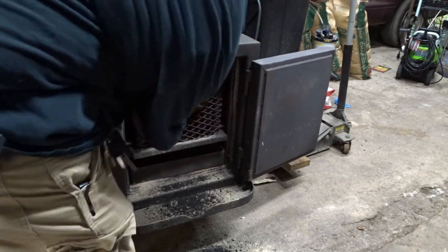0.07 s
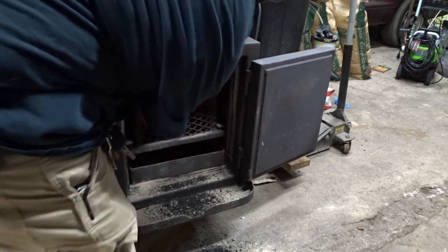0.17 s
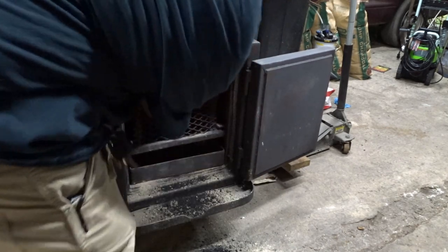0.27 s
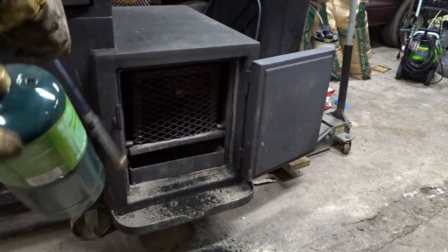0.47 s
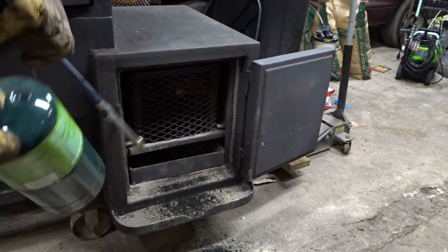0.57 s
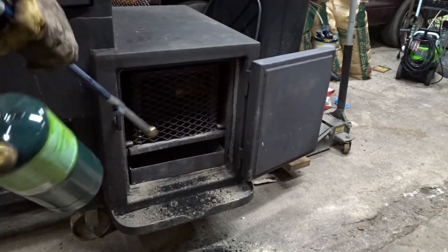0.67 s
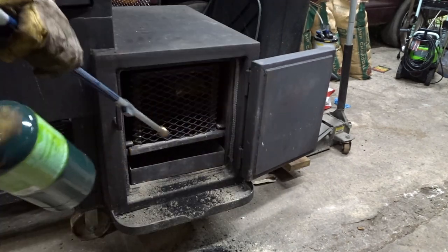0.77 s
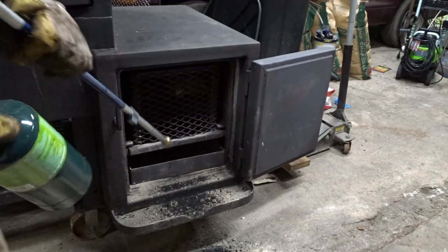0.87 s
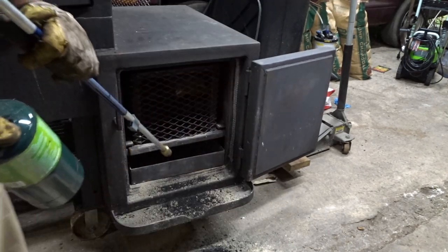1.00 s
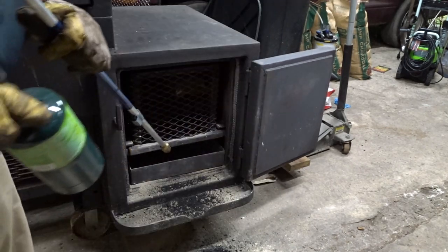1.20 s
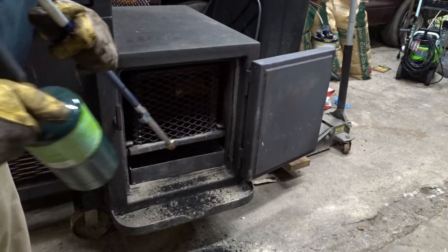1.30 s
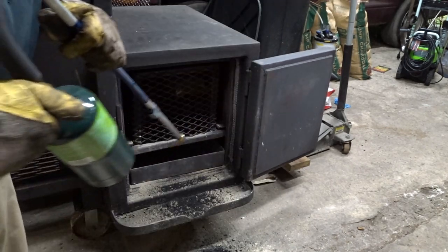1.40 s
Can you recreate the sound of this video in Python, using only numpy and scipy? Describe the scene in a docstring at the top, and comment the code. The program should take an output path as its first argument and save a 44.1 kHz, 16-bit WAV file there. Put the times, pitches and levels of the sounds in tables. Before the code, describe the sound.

Close by in a garage, something shoved over a steel grate hisses, then grinds as the firebox rings and rumbles. The brief scrape stops suddenly; soft cloth rustle and light ticks from a gas torch follow over low hum.

```python
"""A shove across a steel grate

A load is pushed over the grate of a smoker's firebox in a garage. It slides with a rising hiss, then
bites and scrapes, making the steel groan and ring and the box boom, until the sound cuts off abruptly.
Over the quiet room hum, clothes rustle and a hand-held gas torch ticks as it is handled."""
import sys
import numpy as np
from scipy import signal
from scipy.io import wavfile
from scipy.ndimage import uniform_filter1d

SR = 44100
rng = np.random.default_rng(int(sys.argv[2]) if len(sys.argv) > 2 else 0)


def wav_out(sig):
    """Save sig, one row per channel (or a flat mono array), as 16-bit PCM at SR to the path in sys.argv[1]."""
    wavfile.write(sys.argv[1], SR, np.round(np.clip(np.atleast_2d(sig).T, -1, 1) * 32767).astype(np.int16))


N = 63945
TIME = np.arange(N) / SR


def from_db(db):
    """Turn decibels into a number to multiply by."""
    return 10 ** (np.asarray(db) / 20)


def rms_one(x):
    """Scale a sound to an average strength (rms) of one."""
    return x / np.sqrt(np.mean(x ** 2) + 1e-20)


def in_time(rows):
    """Join a table's rows with straight lines: one curve for each column after the time."""
    times, *columns = np.transpose(rows)
    return [np.interp(TIME, times, column) for column in columns]


def at_hz(rows, hz):
    """Read a table at any frequency, with octaves evenly spaced."""
    freqs, values = np.transpose(rows)
    return np.interp(np.log(hz), np.log(freqs), values)


def ramp(start_s, length_s):
    """Rise from zero to one."""
    return np.clip((TIME - start_s) / length_s, 0, 1)


def pan(db):
    """Make the left side louder than the right by this many decibels."""
    return from_db(np.array([[db], [-db]]) / 2)


def drift(rate_hz):
    """A smooth random wander, about one in size."""
    r = np.exp(-2 * np.pi * rate_hz / SR)
    return rms_one(signal.lfilter([1], [1, -2 * r, r * r], rng.standard_normal(N + SR))[SR:])


def resonate(x, hz, width_hz):
    """Let a sound ring at one pitch; the smaller the width, the longer it rings."""
    r = np.exp(-np.pi * width_hz / SR)
    feedback = [1, -2 * r * np.cos(2 * np.pi * hz / SR), r * r]
    return signal.lfilter(np.array([1, 0, -1]) * (1 - r * r) / 2, feedback, x)


def friction(grainy, grains_per_s=2500, spread_db=4):
    """Two streams of tiny clicks in smooth noise; grainy is the clicks' share of the power."""
    sizes = from_db(spread_db * np.minimum(rng.exponential(1, (2, N)), 4))
    signs = rng.choice([-1, 1], (2, N))
    grains = rms_one(sizes * signs * (rng.random((2, N)) < grains_per_s / SR))
    return np.sqrt(grainy) * grains + np.sqrt(1 - grainy) * rng.standard_normal((2, N))


def coloured(colour, likeness, grainy):
    """Stereo friction noise with a given colour (its balance of low and high), built band by band."""
    edges = 18 * 2 ** (np.arange(31) / 3)
    out, streams = 0, [friction(grainy), friction(grainy)]
    for k, (low, high) in enumerate(zip(edges, edges[1:])):
        band = signal.butter(2, [low, high], "band", fs=SR, output="sos")
        mid, side = signal.sosfilt(band, streams[k % 2])
        hz = np.sqrt(low * high)
        alike = at_hz(likeness, hz)
        stereo = np.sqrt(1 + alike) * mid + np.sqrt(1 - alike) * side * [[1], [-1]]
        out += from_db(at_hz(colour, hz)) * stereo
    return rms_one(out)


def ringing(tones, side_db=-10):
    """Random pushes keep an object's natural tones ringing, each held near its own level."""
    out = 0
    for hz, width_hz, db in tones:
        ring = resonate(rng.standard_normal((2, N + SR)), hz, width_hz)
        strength = np.sqrt(uniform_filter1d(ring ** 2, size=4000) + 1e-20)
        mid, side = (ring / strength)[:, SR:]
        spread = from_db(side_db) * min(hz / 600, 2)  # higher tones sound wider
        out += from_db(db) * (mid + spread * side * [[1], [-1]])
    return rms_one(out)


def wavering(hz, db, wander, rough_db):
    """A tone made by rubbing, unsteady in pitch and loudness."""
    phase = 2 * np.pi * np.cumsum(hz * (1 + wander * drift(38.8))) / SR
    return np.sqrt(2) * from_db(db + rough_db * drift(49)) * np.sin(phase)


# colour of the room's noise: f/Hz, level/dB
ROOM_COLOUR = [(12, -37), (20, -7.5), (80, -4), (191, -3), (280, -9), (450, -15.5), (1540, -19.5),
               (4950, -35), (11100, -37), (15500, -54)]
# how alike left and right are in the room: f/Hz, likeness/0-1
ROOM_ALIKE = [(60, 1), (200, 1), (600, 0.83), (2000, 0.39), (5000, 0.03), (12000, 0.033)]
# tones of the hum: f/Hz, width/Hz, level/dB
HUM_TONES = [(55.4, 1.2, -13), (90.3, 0.52, -3), (166.4, 1.8, 3.5), (192.1, 3.7, 0)]
# how the hum wavers: t/s, low tones/dB, higher tones/dB
HUM_LEVELS = [(0, -54, -53.5), (.95, -50.5, -50.5), (1.01, -51.5, -59), (1.24, -52.5, -54.5),
              (1.45, -48.5, -59)]
# a faint hollow tone comes and goes: t/s, level/dB
HOLLOW_LEVELS = [(.68, -65.5), (.79, -50.5), (1.03, -60), (1.13, -55), (1.2, -62)]
def garage(split_hz=120):
    """The room: steady noise, a wavering hum and a faint hollow tone."""
    low_db, high_db = in_time(HUM_LEVELS)
    hollow_db, = in_time(HOLLOW_LEVELS)
    hum = from_db(low_db) * ringing([m for m in HUM_TONES if m[0] < split_hz])
    hum += from_db(high_db) * ringing([m for m in HUM_TONES if m[0] >= split_hz])
    hollow = from_db(hollow_db) * ringing([(526.5, 23, 0)])
    return from_db(-49.5) * coloured(ROOM_COLOUR, ROOM_ALIKE, grainy=0) + hum + hollow


# loudness of the rustle: t/s, level/dB
CLOTH_LEVELS = [(0, -53), (.1, -56.5), (.572, -48.5), (.6, -56), (.76, -53), (.88, -51.5), (.92, -58),
                (1.15, -60), (1.19, -48.5), (1.31, -50), (1.45, -64)]
# colour of the rustle: f/Hz, level/dB
CLOTH_COLOUR = [(200, 5.5), (600, -2.5), (1500, -6), (2600, -7.5), (3700, -4), (6000, -17), (10000, -21.5),
                (15500, -26)]
def clothes():
    """Cloth rubs softly nearby."""
    db, = in_time(CLOTH_LEVELS)
    return from_db(db) * coloured(CLOTH_COLOUR, ROOM_ALIKE, grainy=0.28)


# each tick: t/s, peak/dB, pitch of its ring/Hz, ring compared with the peak/dB
TORCH_TICKS = [(0.891, -40.5, 1630, -0.5), (0.956, -55, 5600, 7), (1.014, -41.5, 5570, -2),
               (1.1718, -35.5, 3930, -8), (1.2152, -34, 2060, -7), (1.2493, -40, 3070, -6),
               (1.269, -31.5, 980, -7), (1.283, -39, 2650, -6)]
# natural tones of the torch: f/Hz, width/Hz, level/dB
TORCH_TONES = [(1930, 82, 0), (2900, 230, 10.5), (3050, 130, 8), (3700, 260, 6), (4780, 360, -1),
               (5200, 300, -10)]
def torch_ticks(snap=10, bounce_s=0.0042, fade_s=0.018, echo_s=0.18, ring_cycles=30):
    """A snap and a bounce shake the torch; the touched part rings and the room echoes faintly."""
    dull = signal.butter(4, 6200, fs=SR, output="sos")
    out = 0
    for s, db, hz, ring_db in TORCH_TICKS:
        age = np.maximum(TIME - s, 0)
        noise = rng.standard_normal((3, N))
        burst = noise[0] * from_db(-60 * age / fade_s)
        echo = noise[1:] * from_db(-9 - 60 * age / echo_s)
        push = (age > 0) * (burst + echo)
        push[:, int(s * SR)] += snap
        push[:, int((s + bounce_s) * SR)] += snap * from_db(-6)
        tick = sum(from_db(level) * resonate(push, f, width) for f, width, level in TORCH_TONES)
        tick = signal.sosfilt(dull, tick)
        ring = from_db(ring_db - 60 * age * hz / ring_cycles) * np.sin(2 * np.pi * hz * age)
        out += from_db(db) * (tick / np.abs(tick).max() + ring)
    return out * pan(4)


# low natural tones of the box: f/Hz, width/Hz, level/dB
BOX_TONES = [(86, 6, -9), (104, 2, 0), (160, 2, -2), (219.5, 3, -5)]
# loudness of the boom: t/s, deep tones/dB, higher tones/dB
BOOM_LEVELS = [(.292, -38.5, -49), (.312, -28, -38), (.35, -35.5, -37), (.395, -32, -26.5),
               (.475, -29.5, -31.5), (.525, -24, -35), (.546, -27.5, -33)]
def box_boom(split_hz=130):
    """The whole box rumbles, deeper as the load slows."""
    deep_db, higher_db = in_time(BOOM_LEVELS)
    deep = from_db(deep_db) * ringing([m for m in BOX_TONES if m[0] < split_hz])
    higher = from_db(higher_db) * ringing([m for m in BOX_TONES if m[0] >= split_hz])
    return deep + higher


# loudness of the singing inside the firebox: t/s, first tone/dB, second tone/dB
SINGING_LEVELS = [(.11, -80, -70), (.17, -45.5, -54), (.23, -38, -43), (.262, -33.5, -28.5),
                  (.283, -39, -42), (.288, -9, -31.5), (.32, -17, -47), (.344, -25, -45), (.362, -13, -34),
                  (.395, -34.5, -38), (.44, -26, -34.5), (.546, -32, -43)]
def box_singing(pitches_hz=(685.4, 891)):
    """Rubbing makes the hollow of the firebox sing two tones, like a pipe."""
    tones = zip(pitches_hz, in_time(SINGING_LEVELS))
    return sum(wavering(hz, db, wander=0.01535, rough_db=2.5) for hz, db in tones)


# each knock: t/s, thud/dB, pitch of the thud/Hz, crack/dB
LOAD_KNOCKS = [(.2205, -12, 677, -39.5), (.2875, -30, 970, -20.5), (.531, -22.5, 322, -44)]
def knocks(thud_s=0.052, crack_s=0.063, crack_hz=1820, width_hz=840):
    """The load catches, bites and lands, each time with a dull thud and a short crack."""
    out = 0
    for s, thud_db, hz, crack_db in LOAD_KNOCKS:
        age = np.maximum(TIME - s, 0)
        thud = from_db(thud_db - 60 * age / thud_s) * np.sin(2 * np.pi * hz * age)
        noise = resonate(rng.standard_normal(N), crack_hz, width_hz)
        crack = rms_one(resonate(noise, crack_hz, width_hz))
        out += thud + (age > 0) * from_db(crack_db - 60 * age / crack_s) * crack
    return out


# the groan rises as it takes hold and sags as the push eases: t/s, f/Hz
GROAN_HZ = [(.34, 326.3), (.38, 342.7), (.45, 344), (.52, 323)]
# loudness of the groan: t/s, level/dB
GROAN_LEVELS = [(.283, -42), (.297, -19), (.333, -27.5), (.35, -16), (.37, -32), (.387, -18), (.44, -16),
                (.478, -19), (.492, -28), (.503, -39), (.523, -35.5), (.546, -24.5)]
def groan():
    """The load sticks and slips so fast that the steel groans, first in fits, then firmly."""
    hz, = in_time(GROAN_HZ)
    db, = in_time(GROAN_LEVELS)
    return wavering(hz, db, wander=0.011, rough_db=2.2) * pan(5)


# loudness of the light slide: t/s, hiss/dB, hollow rubbing/dB
SLIDE_LEVELS = [(.06, -66, -58.5), (.139, -46, -49.5), (.148, -39, -47.5), (.212, -29.5, -33.5),
                (.228, -28.5, -23.5), (.257, -23, -24.5), (.277, -21, -24.5), (.282, -34.5, -17),
                (.31, -51, -51), (.54, -42.5, -59)]
# colour of the hiss: f/Hz, level/dB
HISS_COLOUR = [(400, -11.5), (1200, 5), (1900, 0.5), (2800, -1), (4600, -1), (7000, -10), (10000, -9.5),
               (15500, -20)]
# colour of the rubbing: f/Hz, level/dB
RUBBING_COLOUR = [(60, -65), (150, -8), (310, -3.5), (400, -15.5), (520, -2.5), (660, 1.5), (1000, -31),
                  (2000, -33)]
# how alike left and right are for the slide and the scrape: f/Hz, likeness/0-1
BOX_ALIKE = [(50, 0.4), (120, 0.99), (300, 0.99), (700, 0.95), (1200, 0.76), (2200, 0.76), (4500, 0.05),
             (12000, 0.13)]
def slide():
    """The load glides ever faster, hissing and rubbing; both drop away once it bites."""
    hiss_db, rub_db = in_time(SLIDE_LEVELS)
    hiss = from_db(hiss_db) * coloured(HISS_COLOUR, BOX_ALIKE, grainy=0.62)
    rub = from_db(rub_db) * coloured(RUBBING_COLOUR, BOX_ALIKE, grainy=0.31)
    return hiss + rub


# loudness of the heavy scrape: t/s, grinding/dB, rasp/dB, grit/dB
SCRAPE_LEVELS = [(.284, -21, -31, -41), (.312, -16.5, -27, -25), (.345, -18.5, -25, -29),
                 (.375, -20, -24, -28), (.43, -22, -28, -33.5), (.49, -27, -36.5, -40),
                 (.546, -36, -36, -46.5)]
# colour of the low grinding: f/Hz, level/dB
LOW_GRIND = [(25, -36), (150, -26), (290, 0), (420, -8), (590, 1.5), (720, -6), (950, -7), (1250, -9),
             (1700, -26.5), (4000, -75)]
# colour of the rasp in the middle: f/Hz, level/dB
MID_RASP = [(600, -43), (1000, 1.5), (1300, -4.5), (1650, -1), (2050, -2), (2600, -10.5), (4000, -61)]
# colour of the high grit: f/Hz, level/dB
HIGH_GRIT = [(1500, -21), (2900, 3), (4300, 1.5), (7500, -13.5), (10500, -20.5), (13000, -45)]
# natural tones of the steel plates: f/Hz, width/Hz, level/dB
PLATE_TONES = [(283, 8, -2), (310, 8, -2), (458, 2, -3), (559, 2, 0), (624, 5, 0), (798, 3, -6),
               (1084, 2, -6), (1174, 2, -6), (1242, 2, -8), (1512, 3, -9), (1865, 4, -10), (2056, 4, -8),
               (2445, 5, -14), (3015, 4, -16)]
def scrape(grainy=0.37, split_hz=850):
    """Rough spots and grit grind on the plates and ring them; high tones need the hardest push."""
    grind_db, rasp_db, grit_db = in_time(SCRAPE_LEVELS)
    grind = from_db(grind_db) * coloured(LOW_GRIND, BOX_ALIKE, grainy)
    rasp = from_db(rasp_db) * coloured(MID_RASP, BOX_ALIKE, grainy)
    grit = from_db(grit_db) * coloured(HIGH_GRIT, BOX_ALIKE, grainy)
    push_db = grind_db - grind_db.max()  # zero at the hardest push
    lower = from_db(-20 + 0.55 * push_db) * ringing([m for m in PLATE_TONES if m[0] < split_hz])
    upper = from_db(-23 + 1.3 * push_db) * ringing([m for m in PLATE_TONES if m[0] >= split_hz])
    return grind + rasp + grit + lower + upper


def scene(bite_s=0.2815, cut_s=0.546, fade_s=0.004):
    """The load slides, bites and scrapes until the sound cuts off abruptly, leaving the quiet garage."""
    shove = slide() + box_singing() + knocks()
    shove += ramp(bite_s, 0.0025) * (scrape() + box_boom() + groan())
    cut_off = 1 - ramp(cut_s - fade_s, fade_s)
    return shove * cut_off + torch_ticks() + clothes() + garage()


def record(dry, limit_db=-5, recover_db_per_s=253, smooth_s=0.0025, top_hz=16300):
    """A limiter quickly turns down the loudest moments, and the very highest treble is cut."""
    peak_db = 20 * np.log10(np.abs(dry).max(axis=0) + 1e-9)
    over_db = np.maximum(peak_db - limit_db, 0)
    recovery_db = recover_db_per_s * TIME
    cut_db = np.maximum.accumulate(over_db + recovery_db) - recovery_db  # eases off after each peak
    cut_db = uniform_filter1d(cut_db, size=int(smooth_s * SR))
    treble_cut = signal.cheby2(16, 70, top_hz, fs=SR, output="sos")
    return signal.sosfilt(treble_cut, dry * from_db(-cut_db))


dry = scene()
out = record(dry)
wav_out(out)
```